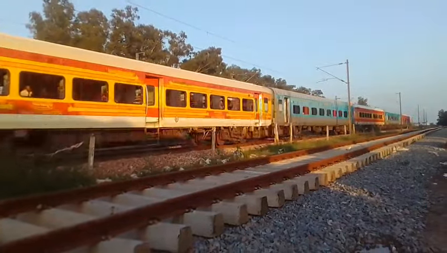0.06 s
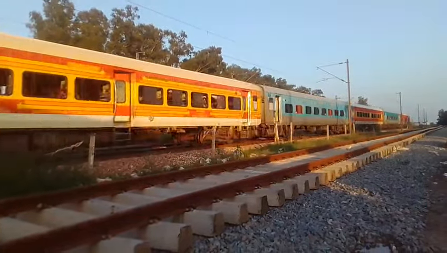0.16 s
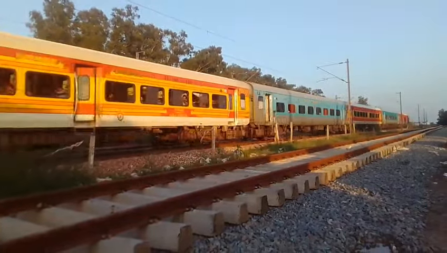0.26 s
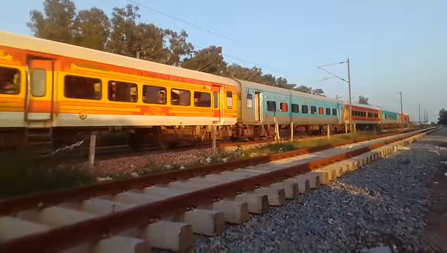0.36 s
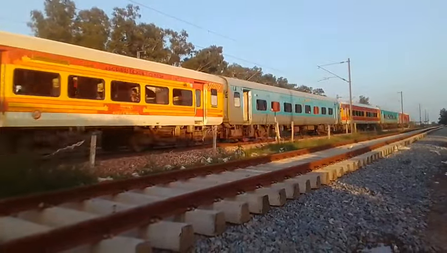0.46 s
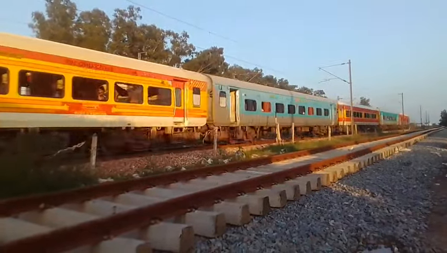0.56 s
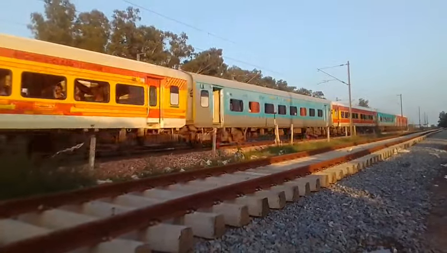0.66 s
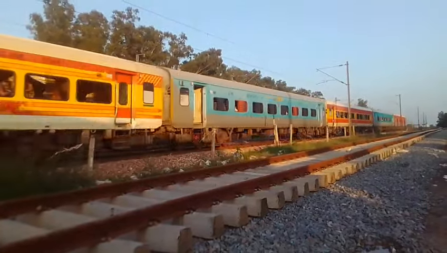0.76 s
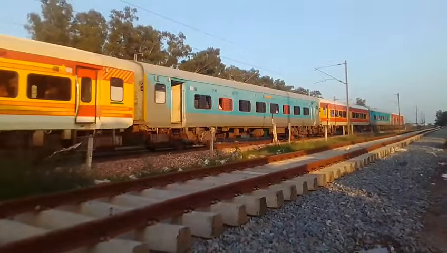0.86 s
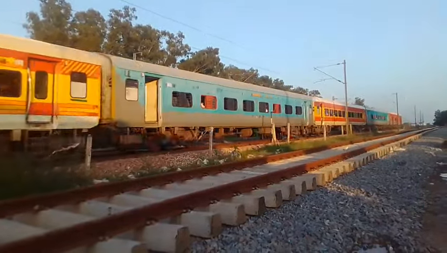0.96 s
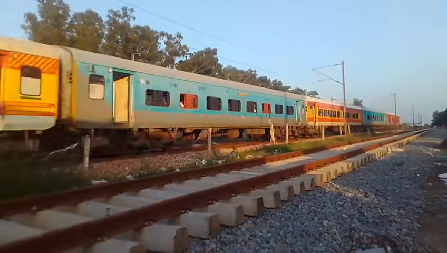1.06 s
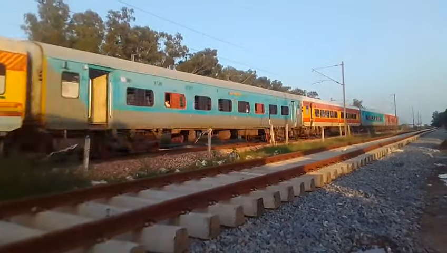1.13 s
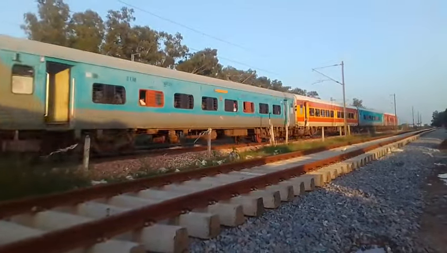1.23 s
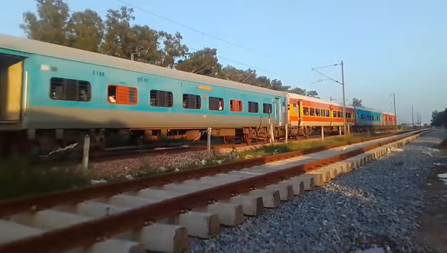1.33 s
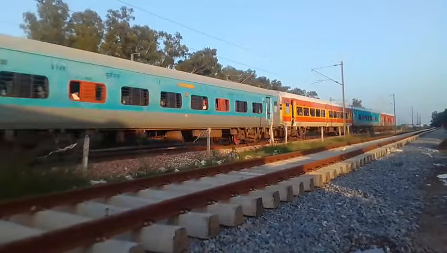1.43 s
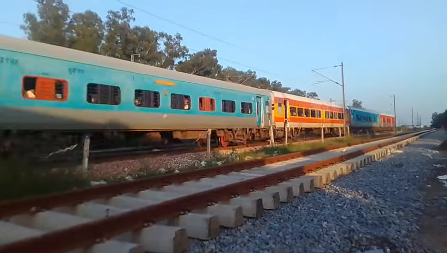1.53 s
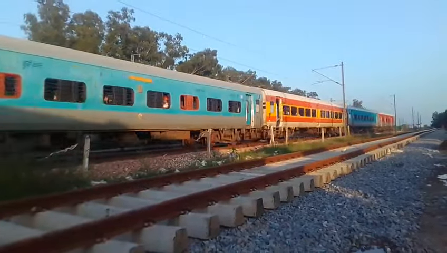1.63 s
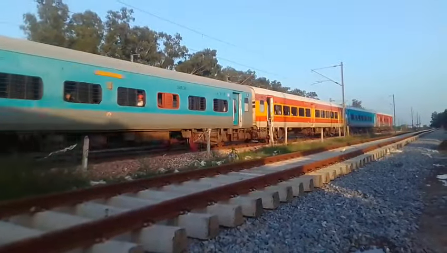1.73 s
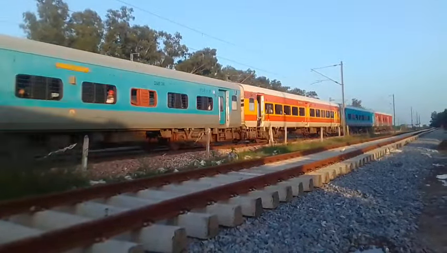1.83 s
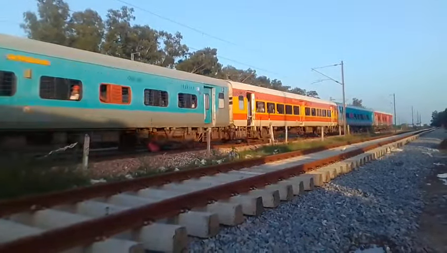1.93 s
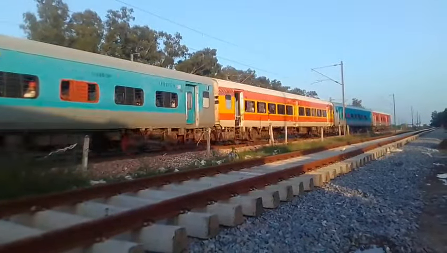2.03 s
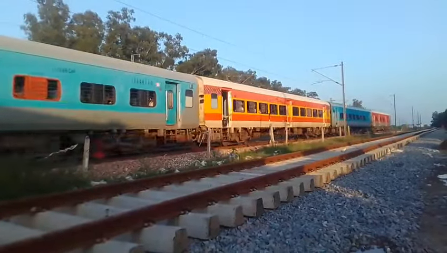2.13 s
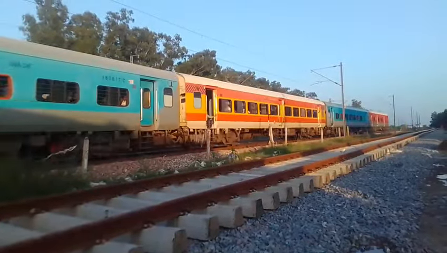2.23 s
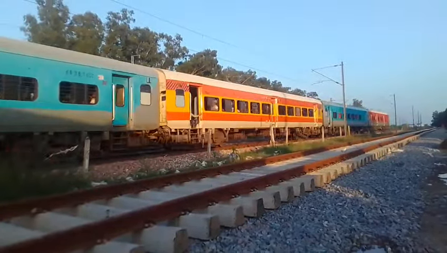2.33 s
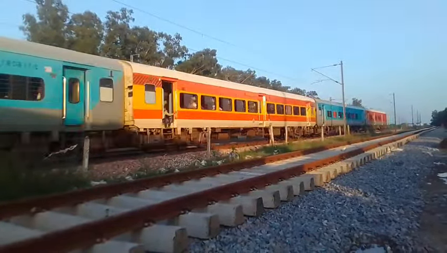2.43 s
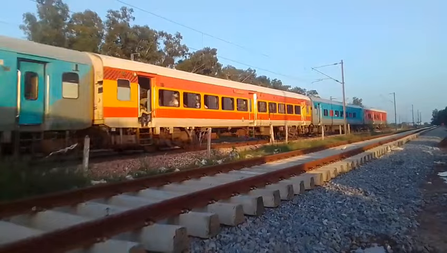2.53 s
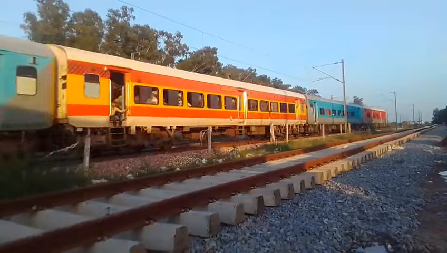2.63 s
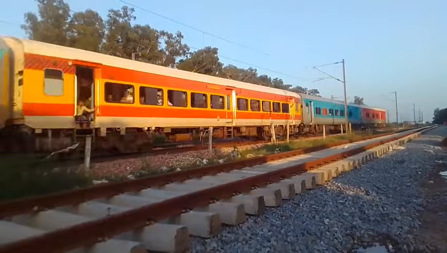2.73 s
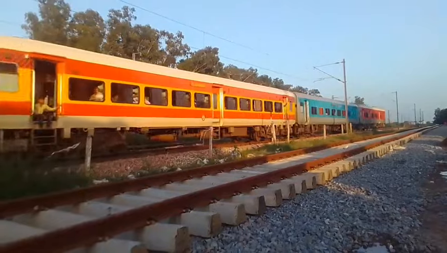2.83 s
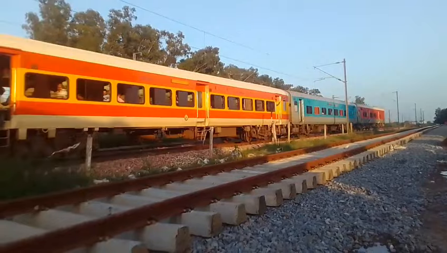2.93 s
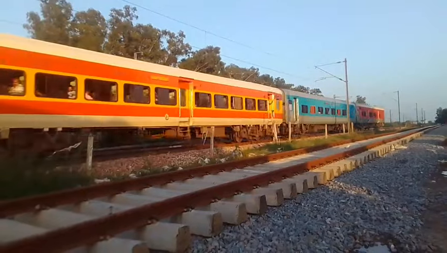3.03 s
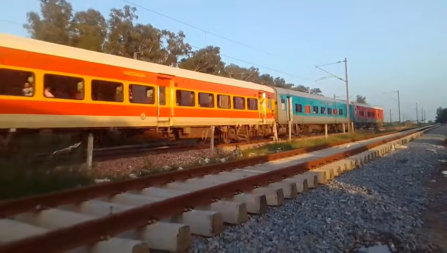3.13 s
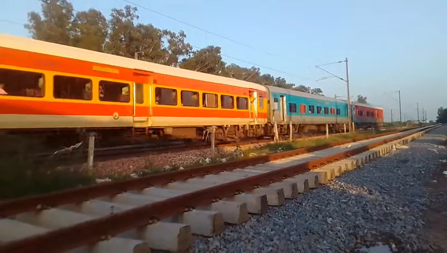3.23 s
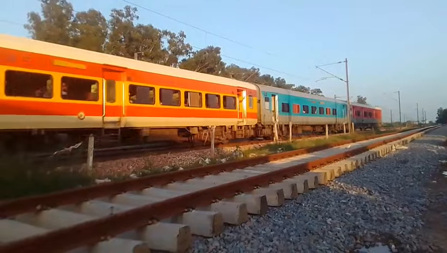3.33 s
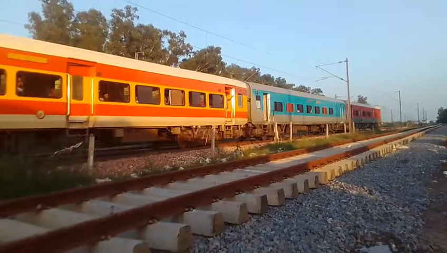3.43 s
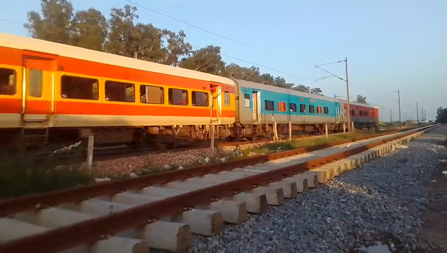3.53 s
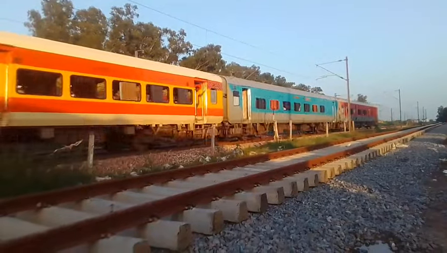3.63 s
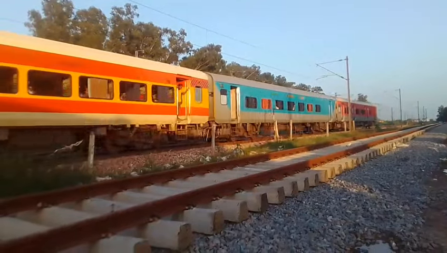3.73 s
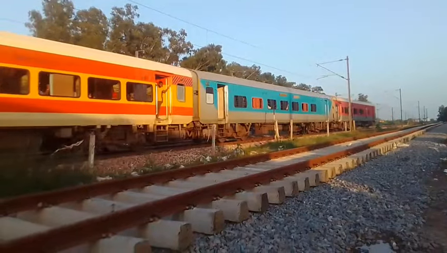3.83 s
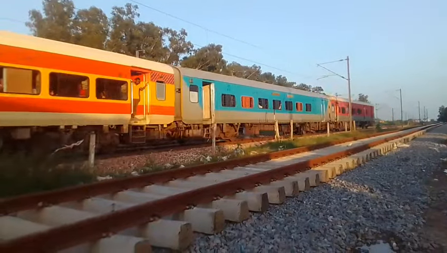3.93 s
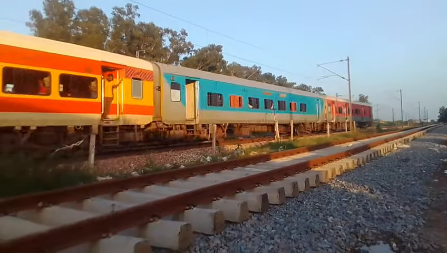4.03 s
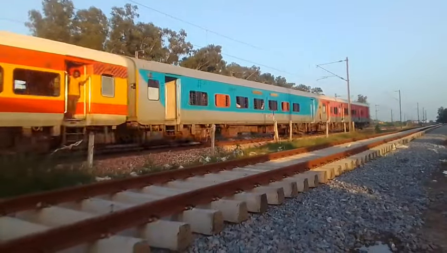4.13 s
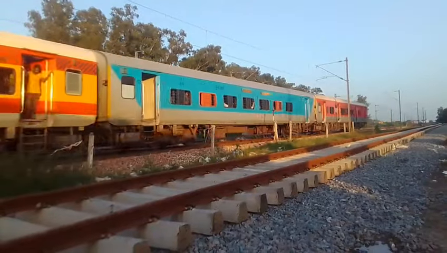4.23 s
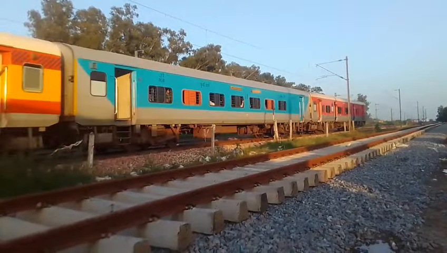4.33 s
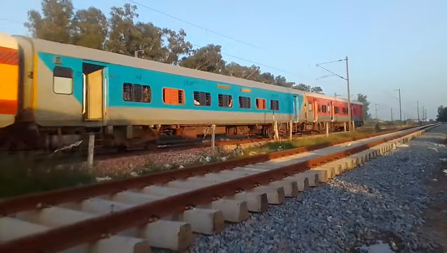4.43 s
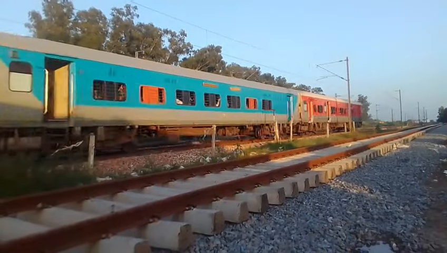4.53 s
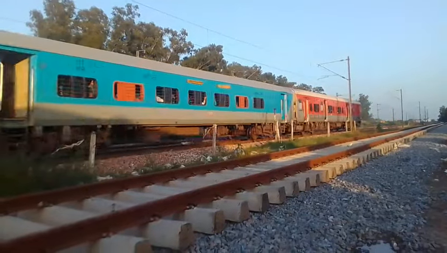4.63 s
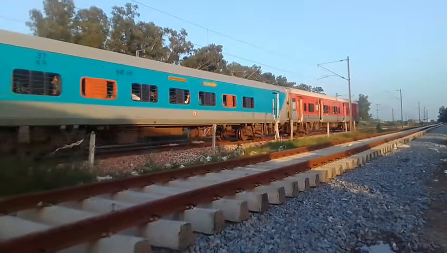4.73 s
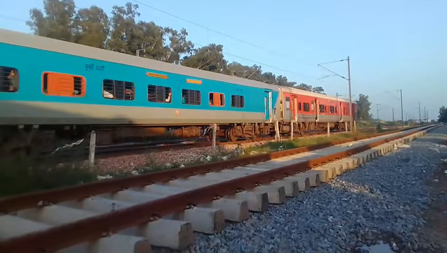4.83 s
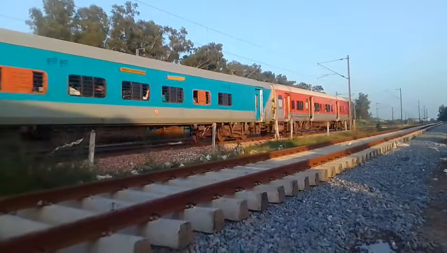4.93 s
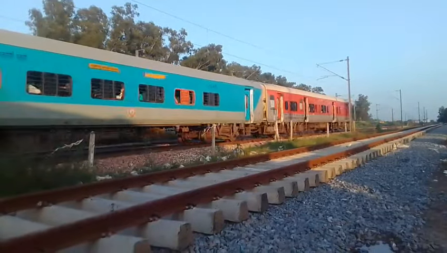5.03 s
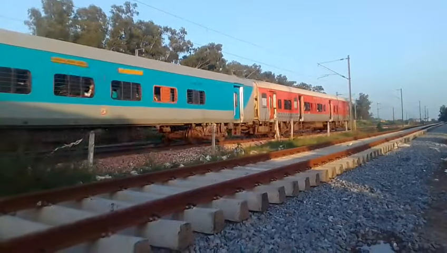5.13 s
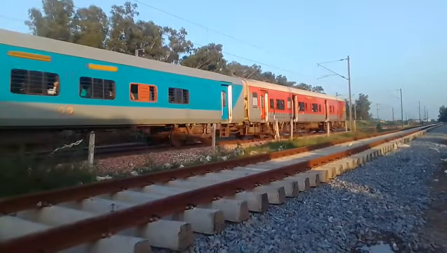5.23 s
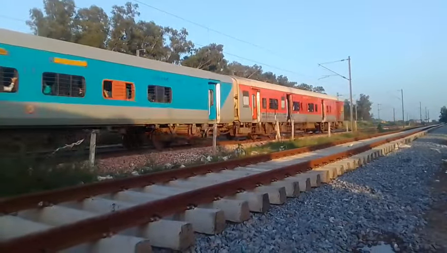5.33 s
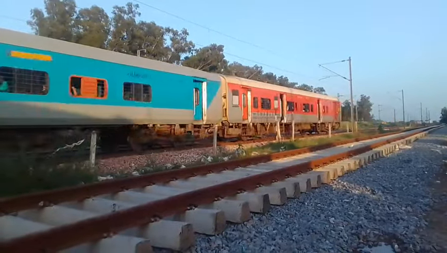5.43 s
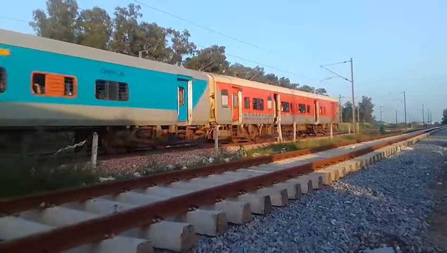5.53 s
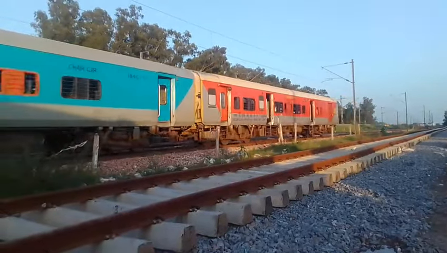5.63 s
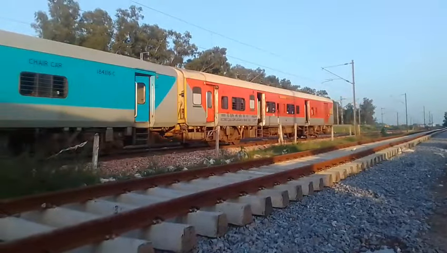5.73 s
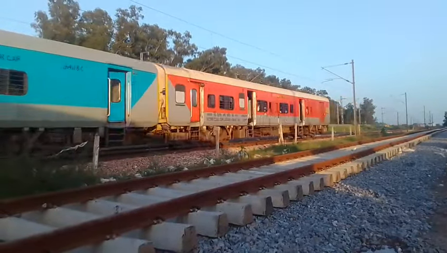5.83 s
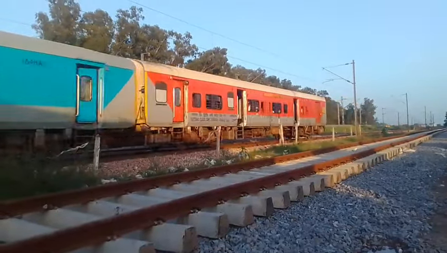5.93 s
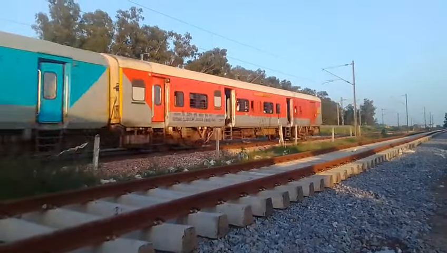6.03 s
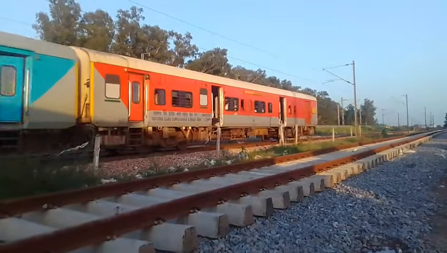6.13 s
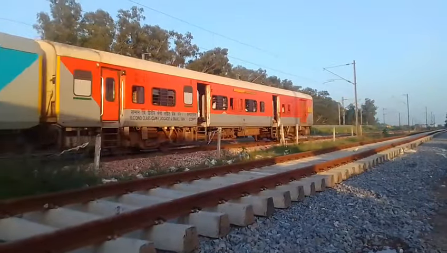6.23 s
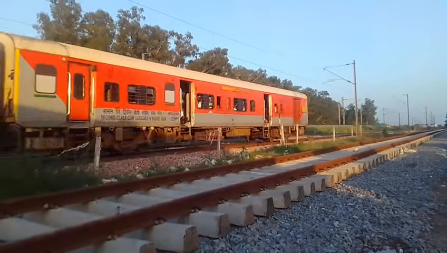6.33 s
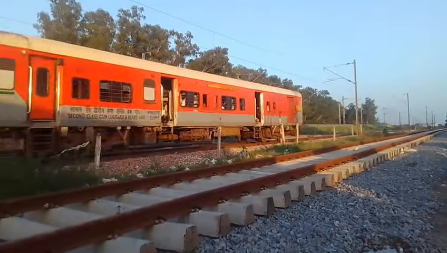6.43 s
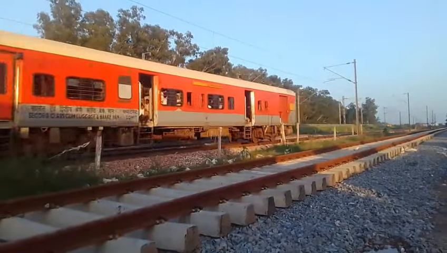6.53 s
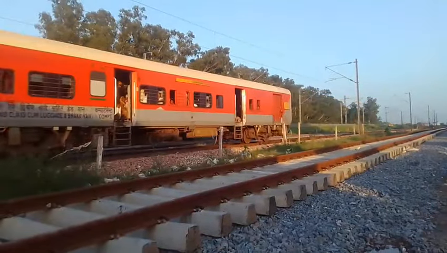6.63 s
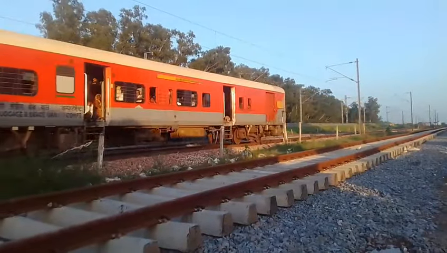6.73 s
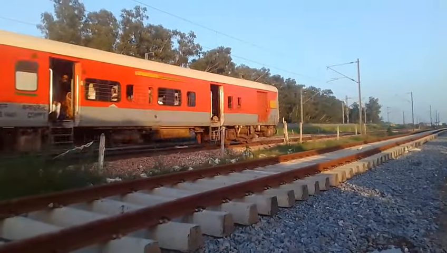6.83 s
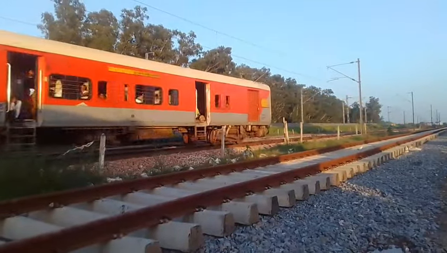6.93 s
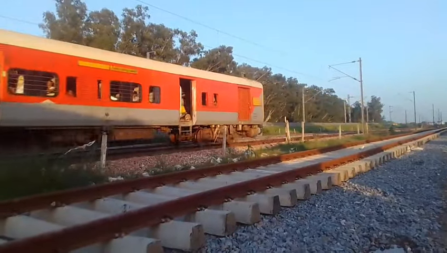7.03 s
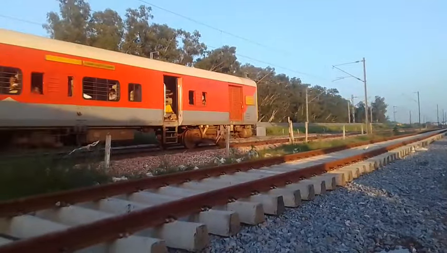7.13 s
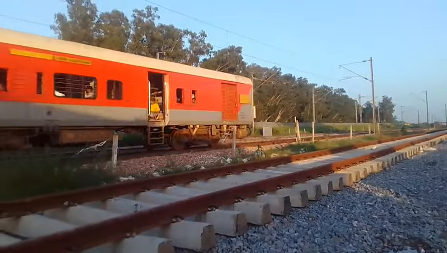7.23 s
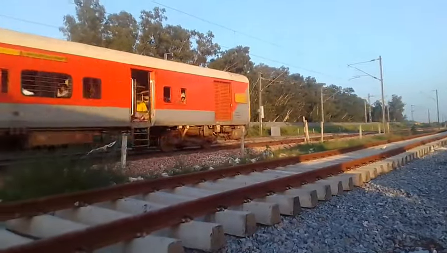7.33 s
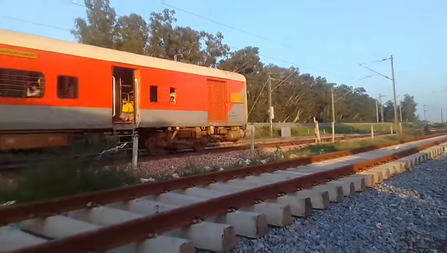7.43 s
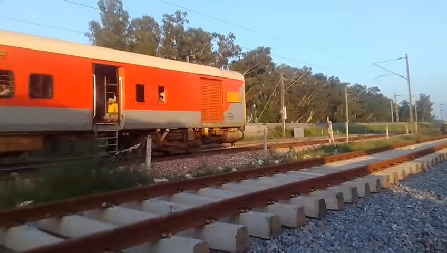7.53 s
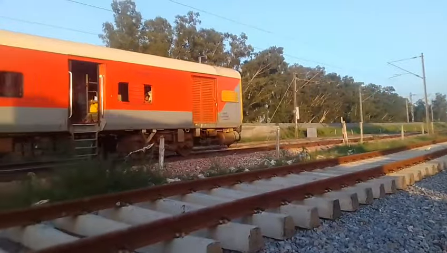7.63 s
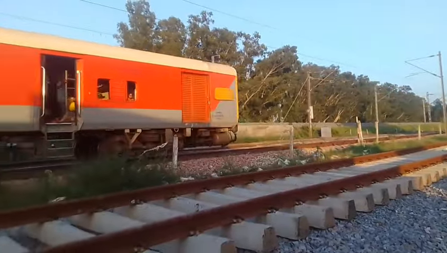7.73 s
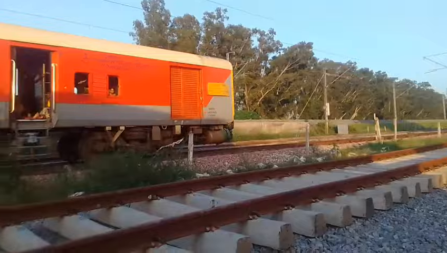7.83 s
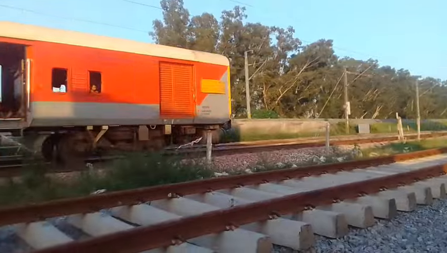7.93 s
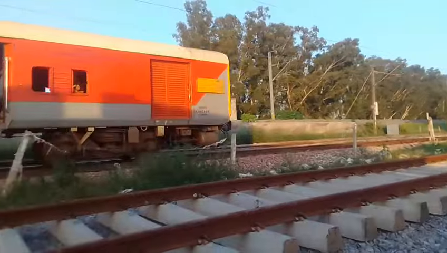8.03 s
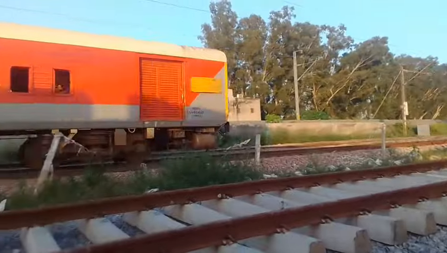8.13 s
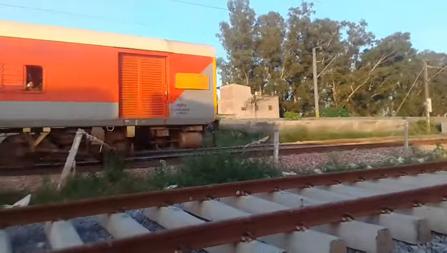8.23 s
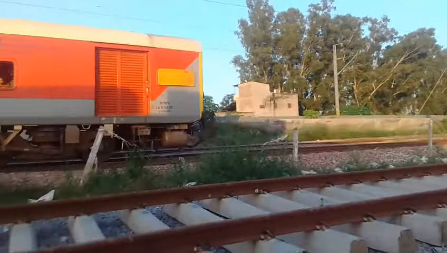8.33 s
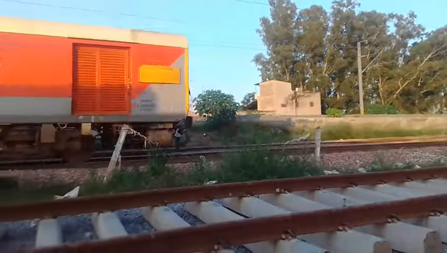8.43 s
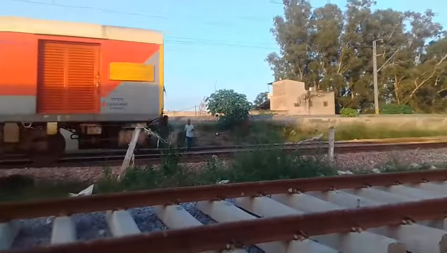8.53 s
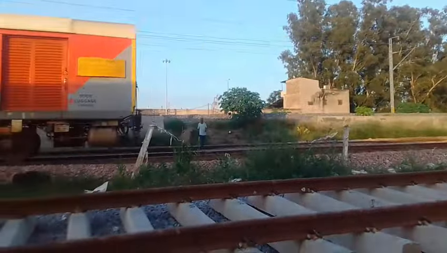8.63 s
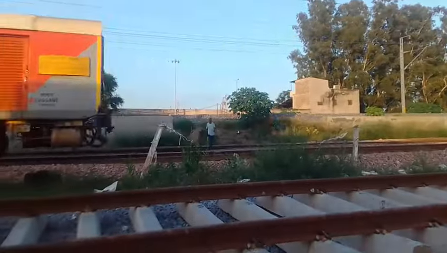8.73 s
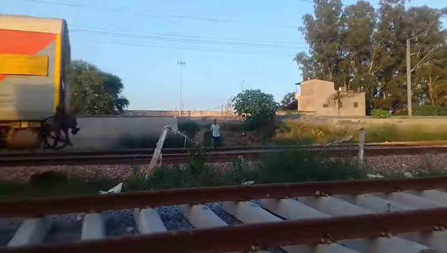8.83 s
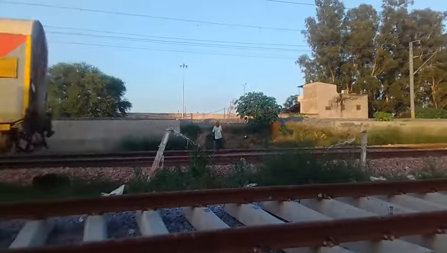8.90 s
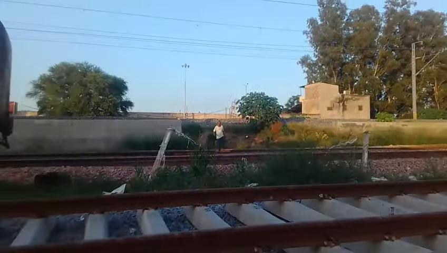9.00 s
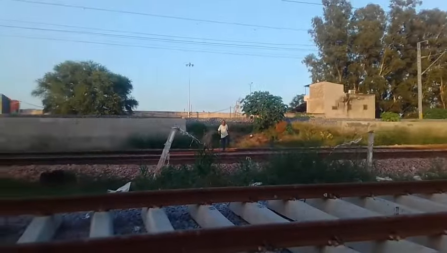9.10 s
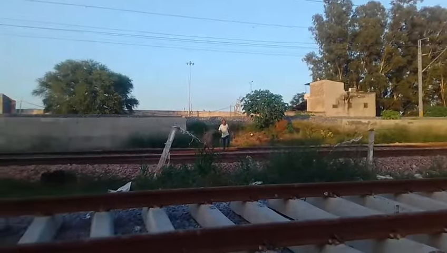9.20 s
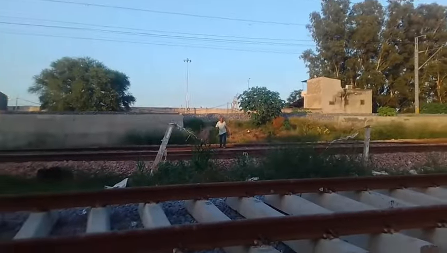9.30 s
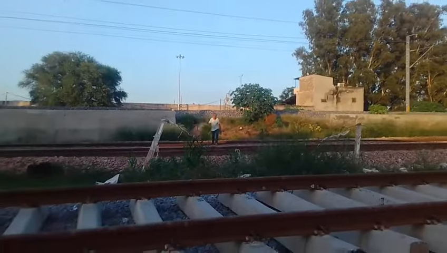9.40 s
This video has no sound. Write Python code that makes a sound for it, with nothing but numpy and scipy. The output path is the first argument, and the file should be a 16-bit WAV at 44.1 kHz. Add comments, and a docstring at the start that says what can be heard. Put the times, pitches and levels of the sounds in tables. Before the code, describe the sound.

Heard from a microphone beside an outdoor track, a gently slowing passenger train rolls by with a dense rush of wheels over a low rumble. Ringing clacks from a rail joint and uneven wheel knocks run through it, along with faint high singing from the metal. Near the end the rolling noise drops and a string of brief wheel squeals stands out as the train leaves.

```python
"""The rolling wheels of a slowing passenger train's last four coaches, heard in mono beside the track.
Their rough treads shake the ground, sleepers, bogies, rail and wheel discs into one broad rush.
Each axle clacks over a rail joint, and worn wheels knock. Flanges stick and slip on single
wheel modes, singing and squealing, clearest as the tail draws away."""
import sys
import numpy as np
from scipy import signal
from scipy.fft import rfft, irfft, next_fast_len
from scipy.io import wavfile
from scipy.ndimage import uniform_filter1d

SR = 44100
rng = np.random.default_rng(int(sys.argv[2]) if len(sys.argv) > 2 else 0)


def pcm_store(signal):
    """Save signal as 16-bit PCM."""
    levels = np.round(np.clip(np.atleast_2d(signal), -1, 1) * 32767)
    wavfile.write(sys.argv[1], SR, levels.astype(np.int16).T)


N = 417167

# Faders of the pass-by: (time [s], sleeper rumble [dB], bogie drone [dB], rail roar [dB],
# wheel rush [dB], top hiss [dB])
ROLLING_FADERS = [(0.0, -24, -28, -25, -19.5, -40), (0.39, -27.5, -28, -23, -21, -42.5),
                  (0.87, -27.5, -31.5, -30, -21, -44), (1.32, -28, -28.5, -32, -21.5, -45),
                  (1.6, -26.5, -29.5, -28, -20.5, -41), (1.95, -28, -33, -29, -24.5, -45),
                  (2.34, -29.5, -30, -27, -21.5, -41.5), (2.82, -28, -32.5, -30, -24, -46),
                  (3.61, -28.5, -33, -29.5, -24.5, -45), (4.08, -31.5, -34, -32, -24, -48.5),
                  (4.5, -27, -31.5, -32, -25, -48), (5.09, -27, -32.5, -31, -20.5, -40.5),
                  (5.27, -26, -32, -28.5, -22.5, -41.5), (6.06, -30, -34.5, -29.5, -25, -43.5),
                  (6.43, -29, -33, -32.5, -28, -47), (6.8, -29.5, -34, -30, -25.5, -44.5),
                  (7.72, -35, -39, -32.5, -31.5, -50.5), (7.93, -34, -39.5, -36, -32.5, -52),
                  (8.22, -36.5, -39.5, -35.5, -29.5, -54), (8.51, -38, -39.5, -37.5, -34, -55),
                  (8.98, -38.5, -42, -39, -34.5, -54), (9.46, -41, -45, -41, -40, -59)]
# Fader of the ground boom: (time [s], level [dB])
GROUND_FADER = [(0, -39.5), (2.8, -37), (5.1, -41), (9.46, -43)]


def rolling(layers):
    """The rush of all the wheels, each layer riding its own fader as the coaches pass."""
    t = np.arange(N) / SR
    times, *faders = np.transpose(ROLLING_FADERS)
    ground_db = np.interp(t, *np.transpose(GROUND_FADER))
    levels_db = [ground_db] + [np.interp(t, times, fader) for fader in faders]
    return np.sum(undb(levels_db) * layers, axis=0)


# EQ curves of the shaken parts: (frequency [Hz], relative level [dB])
GROUND_EQ = [(13, -62), (22, -38), (65, -17), (135, -4.5), (180, -12), (300, -120)]
SLEEPER_EQ = [(71, -31.5), (120, -9), (161, -3), (238, -0.5), (312, -7), (480, -14.5), (620, -37),
              (1060, -120)]
BOGIE_EQ = [(260, -1.5), (450, -10), (615, 2), (709, 0), (901, 2), (1350, -8), (1760, -48), (2970, -120)]
RAIL_EQ = [(760, -39), (1300, -6), (1810, 1), (1990, -0.5), (2240, -0.5), (3100, -2.5), (4030, -39),
           (6820, -120)]
WHEEL_EQ = [(1650, -73), (2800, -15.5), (3400, 1), (5110, 1.5), (6620, 5.5), (7460, 2), (9200, -20),
            (12000, -49), (20200, -120)]
HISS_EQ = [(5000, -43), (8500, -4.5), (9180, -4), (10000, 0.5), (13000, -6.5), (14900, -11.5), (16000, -16)]
# Their resonances: (frequency [Hz], width [Hz], level against the part's broad sound [dB])
SLEEPER_RINGS = [(169.8, 51, -14.5), (234, 60, -9.5)]
BOGIE_RINGS = [(553.5, 88, -22.5), (711, 24, -26.5), (926, 66, -21)]
RAIL_RINGS = [(1537, 183, -17), (1801, 79, -17), (2143, 60, -15.5), (2338, 210, -18)]


def rolling_layers(ping_db):
    """Rough treads drive six layers, from ground boom up to top hiss, each at power 1."""
    shake = roughness(grain_db=1, flicker_db=1, flicker_hz=10)
    contact = roughness(grain_db=1.3, flicker_db=0.66, flicker_hz=25)
    pings = dent_pings(count=4000, low_hz=1303, high_hz=14910, ring_s=0.014, spread_db=2.22)
    contact += undb(ping_db) * pings
    return np.array([shaken_part(shake, GROUND_EQ),
                     shaken_part(shake, SLEEPER_EQ, SLEEPER_RINGS, swell_hz=6),
                     shaken_part(shake, BOGIE_EQ, BOGIE_RINGS),
                     shaken_part(contact, RAIL_EQ, RAIL_RINGS),
                     shaken_part(contact, WHEEL_EQ),
                     shaken_part(contact * undb(1.6 * wander(32)), HISS_EQ)])


def roughness(grain_db, flicker_db, flicker_hz):
    """Contact noise of wheel on rail: grainy, and flickering as patches of wear go by."""
    grains = undb(grain_db * rng.exponential(size=N))
    return unit(rng.standard_normal(N) * grains * undb(flicker_db * wander(flicker_hz)))


def dent_pings(count, low_hz, high_hz, ring_s, spread_db):
    """Dents on the treads set scattered disc and web modes ringing for a moment; power 1."""
    t = np.arange(4096) / SR
    out = np.zeros(N + len(t))
    for when, pitch, softness, length in rng.random((count, 4)):
        hz = low_hz + (high_hz - low_hz) * pitch
        gain = undb(-spread_db * np.log(0.055 + softness))
        age = t / (ring_s * (0.38 + length))
        at = int(when * N)
        out[at:at + len(t)] += gain * age * np.exp(-age) * np.sin(2 * np.pi * hz * t)
    return unit(out[:N])


def shaken_part(drive, eq, modes=(), swell_db=3.5, swell_hz=8):
    """The broad sound of one part plus its resonances, each swelling on its own; power 1."""
    rings = sum(undb(db + swell_db * wander(swell_hz)) * resonate(drive, hz, width)
                for hz, width, db in modes)
    return unit(unit(equalise(drive, eq)) + rings)


# Axles over the rail joint, four to a coach: (clack level [dB], main ring against the clack [dB])
AXLE_HITS = [(-20, 1), (-20, -4), (-14, -13), (-18.5, -9), (-18, 0), (-15, -12), (-18.5, -2), (-18.5, -6),
             (-16.5, -7), (-16.5, -6), (-15, -9), (-18, 0), (-14.5, -11), (-19, -3), (-18, -12), (-17, -10)]
COACH_M, BOGIE_SPACING_M, AXLE_SPACING_M = 24, 14.9, 2.56
FIRST_AXLE_S, SPEED_M_S, BRAKING_M_S2 = 0.53, 15.943, 0.5777


def joint_hits(length_ms=21, thump_db=-15, rail_db=-14.5, hiss_db=-29.5):
    """Cues for clacks(): axle after axle drops into the joint, ever slower as the train brakes."""
    axle = np.arange(len(AXLE_HITS))
    metres = axle // 4 * COACH_M + axle // 2 % 2 * BOGIE_SPACING_M + axle % 2 * AXLE_SPACING_M
    speeds = np.sqrt(SPEED_M_S ** 2 - 2 * BRAKING_M_S2 * metres)
    times = FIRST_AXLE_S + (SPEED_M_S - speeds) / BRAKING_M_S2
    return [(time, db, length_ms, thump_db, rail_db, ring_db, hiss_db)
            for time, (db, ring_db) in zip(times, AXLE_HITS)]


# Knocks of worn wheels: (time [s], level [dB], length [ms], thump against the knock [dB],
# hiss against the knock [dB])
WHEEL_KNOCKS = [(0.066, -29.5, 9, 5, -21), (0.13, -16, 34, -11, -32), (0.436, -31, 8.1, 8.5, -24),
                (1, -25.5, 9, -2, -16), (1.04, -18, 11, -21, -22), (1.195, -18, 51, -9, -23),
                (1.375, -17.5, 30, -8, -24), (1.56, -16.5, 19, -10, -21), (1.732, -20, 23, -5, -18),
                (1.883, -28, 9.1, -1, -17), (1.917, -22, 57, -7, -22), (2.439, -26.5, 10, 6.5, -12),
                (2.813, -24, 24, -3, -25), (4.571, -21.5, 10, -21, -25), (5.099, -24, 16, -25, -14),
                (5.138, -22.5, 30, -11, -20), (5.321, -20, 12, -11, -23), (5.588, -22.5, 12, -13, -20),
                (5.807, -26, 13, -2.5, -22), (5.908, -23, 12, -15, -11), (6.119, -32, 11, 5.5, -3),
                (6.221, -24, 13, -2, -16), (6.42, -26, 7.4, -4, -16), (6.562, -23, 10, -11, -13),
                (7.01, -28, 11, -2, -12), (7.263, -31, 17, -13, -12), (8.224, -28, 31, -15, -24),
                (8.336, -27, 11, -24, -24)]


def worn_wheel_hits(ring_db=-13):
    """Cues for clacks(): worn treads strike the rail, often about once a wheel turn."""
    return [(time, db, length_ms, thump_db, thump_db - 3, ring_db, hiss_db)
            for time, db, length_ms, thump_db, hiss_db in WHEEL_KNOCKS]


# Wheel disc modes rung by a hit: (frequency [Hz], width [Hz], level against the hit [dB])
DISC_RINGS = [(2794, 150, -15.5), (3460, 49, -24), (4210, 150, -14), (6280, 43, -8.5), (6830, 320, -8),
              (7840, 38, -17.5), (8540, 52, -21.5), (9300, 79, -27)]
MAIN_RING_HZ, MAIN_RING_WIDTH_HZ = 4710, 130


def clacks(layers, hits):
    """A struck wheel rattles: a burst into track and discs, and the disc modes ring after."""
    # Shifted in time, so the bursts are independent of the rolling noise under them.
    _, sleepers, bogies, rail, rush, hiss = np.roll(layers, N // 3, axis=1)
    grit = roughness(grain_db=0.75, flicker_db=1.1, flicker_hz=150)
    scatter_db = 2 * rng.standard_normal((len(hits), len(DISC_RINGS)))
    out = np.zeros(N)
    for (time, db, length_ms, thump_db, rail_db, ring_db, hiss_db), offsets_db in zip(hits, scatter_db):
        at = np.arange(int((time - 0.06) * SR), int((time + 0.16) * SR))
        age = (at / SR - time) / (length_ms / 1000) + 0.34
        attack = np.exp(-(age / 0.5) ** 2)
        tail = 1 / (1 + (age / 1.08) ** 2) ** 0.95
        burst = np.where(age < 0, attack, tail)
        strike = grit[at] * burst
        rings = undb(ring_db) * resonate(strike, MAIN_RING_HZ, MAIN_RING_WIDTH_HZ)
        for (hz, width, mode_db), offset_db in zip(DISC_RINGS, offsets_db):
            rings += undb(mode_db + offset_db) * resonate(strike, hz, width)
        track = undb(thump_db) * sleepers[at] + undb(rail_db) * (bogies[at] + rail[at])
        wheel = undb(-3.5) * rush[at] + undb(hiss_db) * hiss[at]
        out[at] += undb(db) * (burst * (track + wheel) + rings)
    return out


# Flange squeals: (start [s], length [s], pitch [Hz], glide [Hz], level [dB], octave against the tone [dB])
FLANGE_SQUEALS = [(-.2, 0.36, 4100, -22, -25, -40), (.04, 0.063, 1550, -20, -25, -40),
                  (0.151, 0.85, 4120, -20, -30, -40), (.36, 0.15, 2135, -18, -26, -40),
                  (.5, 1.6, 8240, -120, -37, -40), (0.947, 0.21, 4150, -22, -26.5, -40),
                  (1.7, 0.99, 7950, -230, -32, -40), (1.91, .13, 2380, -10, -33, -40),
                  (2.05, 0.33, 1805, -1, -35, -40), (2.784, 0.15, 4690, -68, -29, -40),
                  (2.856, 0.28, 7900, -32, -36, -40), (3.417, 0.37, 7580, -2, -44, -40),
                  (3.762, 0.15, 5880, -50, -19.5, -40), (7.15, 0.15, 3060, -3, -32.5, -4),
                  (7.225, .1, 3970, 20, -33, -40), (7.415, 0.24, 2375, 16, -30.5, -17),
                  (7.627, 0.294, 2486, 38.5, -30, -4), (7.946, 0.15, 5740, 63, -26.5, -40),
                  (8.01, 0.18, 6540, -68, -32, -40), (8.137, .05, 4890, 20, -35, -40),
                  (8.247, 0.21, 3095, -23.5, -30.5, -2.5), (8.413, .1, 2420, -8, -33.5, -40),
                  (8.67, 0.24, 6400, -120, -36, -40), (8.948, 0.37, 2423, -6.5, -28.5, -7),
                  (9.41, .1, 5560, 0, -43, -38)]


def flange_squeal(start, length, hz, glide_hz, db, octave_db, attack_share=0.34, rasp_hz=105.2):
    """A flange sticks and slips on one wheel mode: a tone whose grip tears at random, so it rasps."""
    at = np.arange(N)[max(int(start * SR), 0):int((start + length) * SR)]
    progress = (at / SR - start) / length
    swell = np.sin(np.pi / 2 * np.interp(progress, [0, attack_share, 1], [0, 1, 0])) ** 1.32
    phasor = np.exp(2j * np.pi * np.cumsum(hz + glide_hz * progress) / SR)
    tone = 0
    for harmonic, harmonic_db in enumerate([0, octave_db, octave_db - 17, octave_db - 21], 1):
        slip_hz = 2 * rasp_hz * harmonic  # overtones rasp wider
        slip = wander(slip_hz, len(at)) + 1j * wander(slip_hz, len(at))
        grip = 0.73 + 0.58 * slip
        tone += undb(harmonic_db) * (grip * phasor ** harmonic).real
    out = np.zeros(N)
    out[at] = np.sqrt(2) * undb(db) * swell * tone
    return out


def resonate(x, hz, width_hz):
    """One steep resonance; white noise keeps about its power."""
    b, a = signal.iirpeak(hz, hz / width_hz / 1.17, SR)
    return signal.lfilter(b, a, signal.lfilter(b, a, x)) * np.sqrt(SR / (2 * width_hz))


def equalise(x, eq):
    """Shapes a sound with an EQ curve drawn over log frequency."""
    size = next_fast_len(N)
    hz, db = np.transpose(eq)
    bin_hz = np.maximum(np.arange(size // 2 + 1) * SR / size, 1)
    gain = undb(np.interp(np.log(bin_hz), np.log(hz), db, -120, -120))
    return irfft(rfft(x, size) * gain, size)[:N]


def wander(rate_hz, size=N):
    """A random modulator: sample-and-hold smoothed twice, with a spread near 1."""
    hold = int(SR / rate_hz)
    steps = np.repeat(rng.standard_normal(size // hold + 1), hold)
    return 1.42 * uniform_filter1d(uniform_filter1d(steps, hold), hold)[:size]


def undb(db):
    return 10 ** (np.asarray(db) / 20)


def unit(x):
    return x / np.sqrt(np.mean(x ** 2))


def scene():
    """Rolling, clacks and squeals, mixed the same into both channels."""
    layers = rolling_layers(ping_db=-9)
    hits = joint_hits() + worn_wheel_hits()
    squeals = sum(flange_squeal(*row) for row in FLANGE_SQUEALS)
    return np.tile(rolling(layers) + clacks(layers, hits) + squeals, (2, 1))


def record(dry):
    """The phone cuts the top above 15.5 kHz."""
    return signal.sosfilt(signal.ellip(10, 0.2, 70, 15500, fs=SR, output="sos"), dry)


dry = scene()
out = record(dry)
pcm_store(out)
```